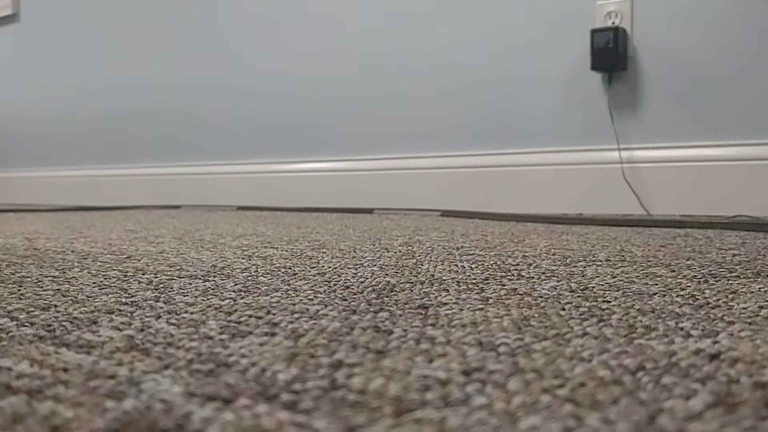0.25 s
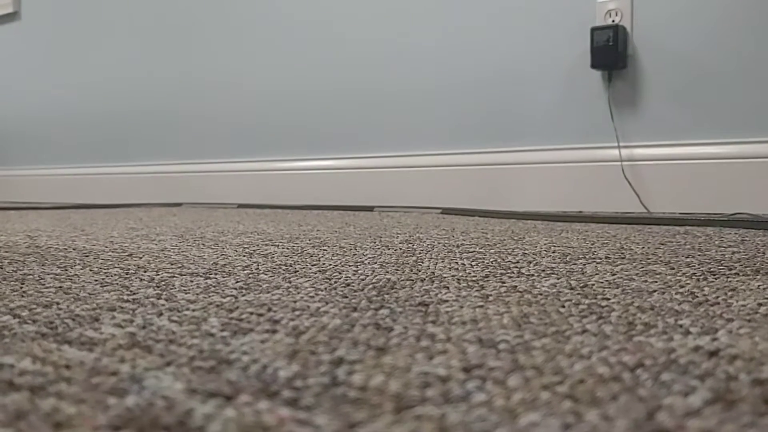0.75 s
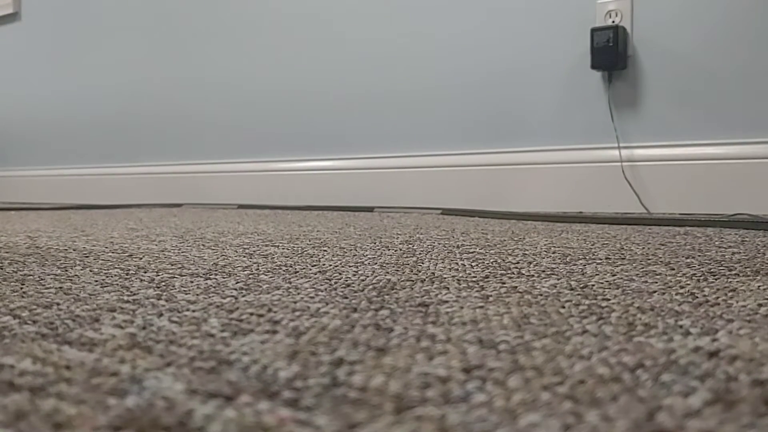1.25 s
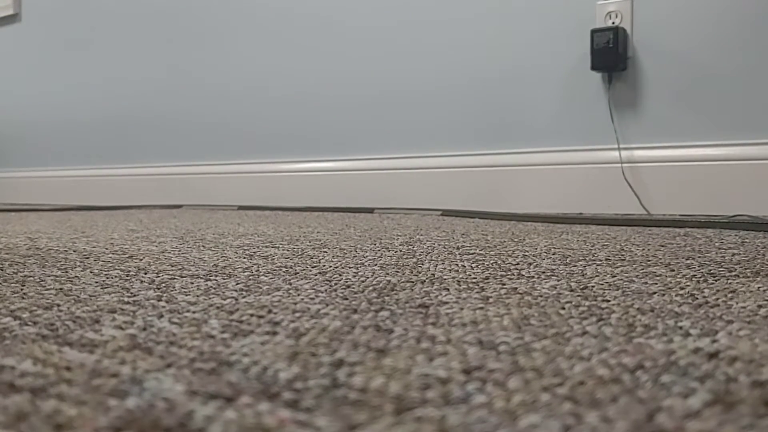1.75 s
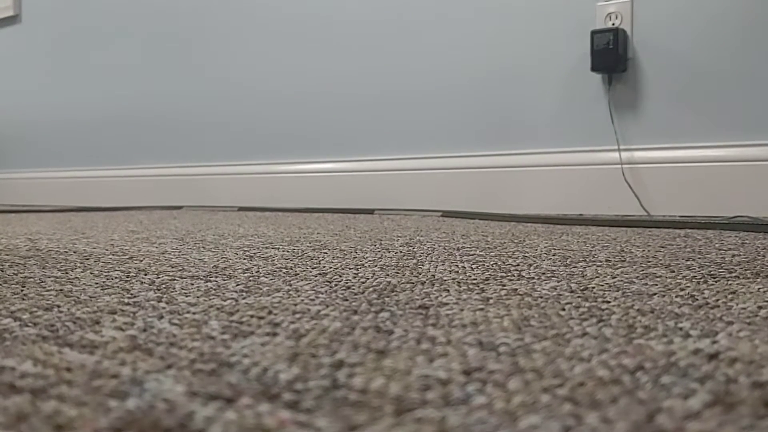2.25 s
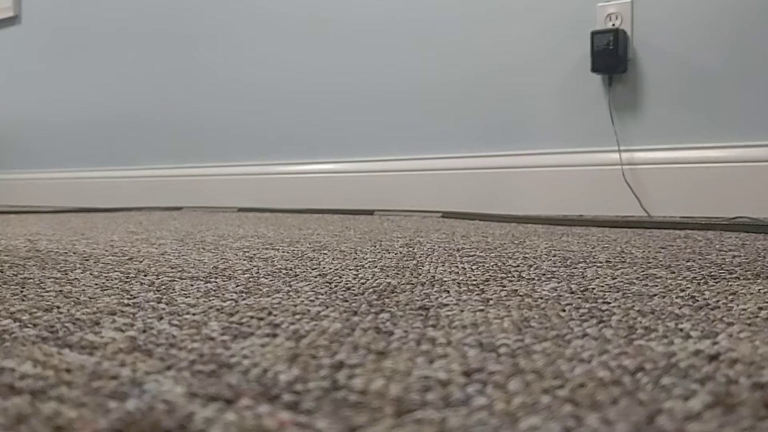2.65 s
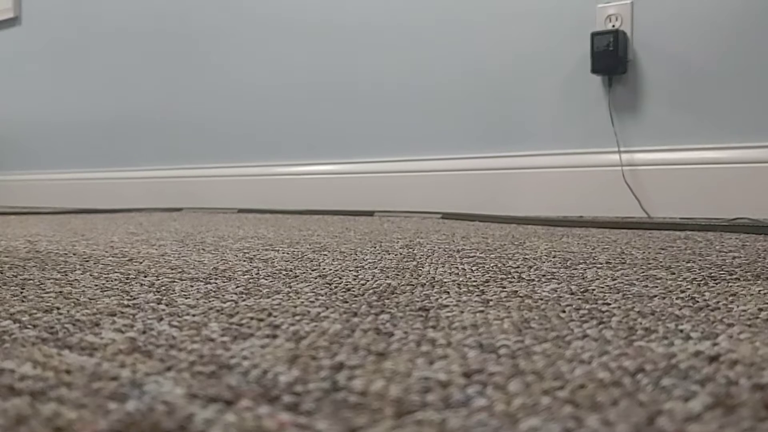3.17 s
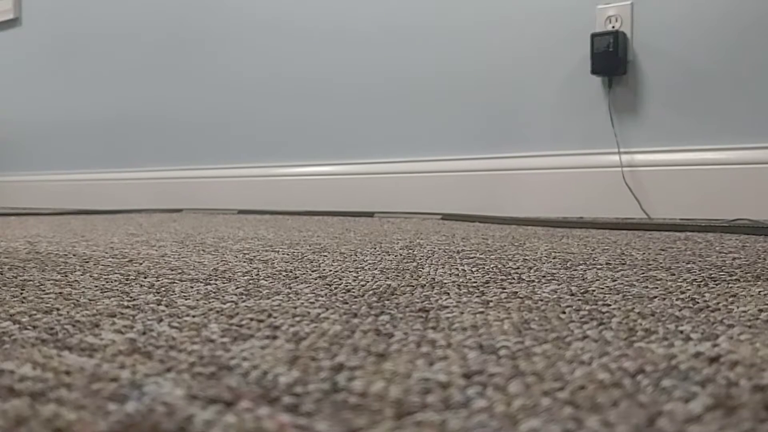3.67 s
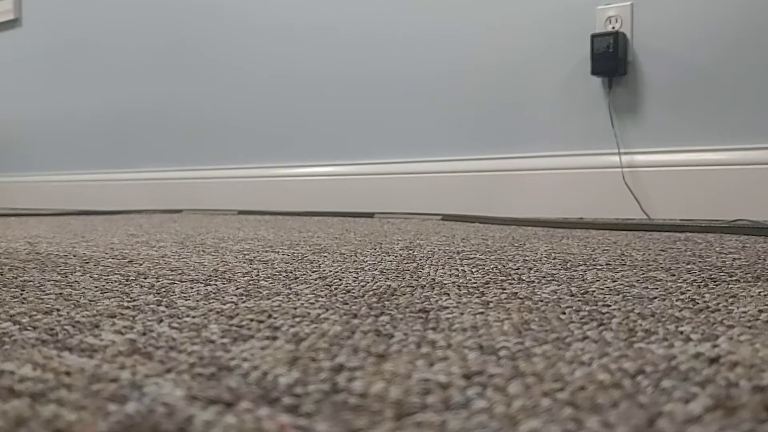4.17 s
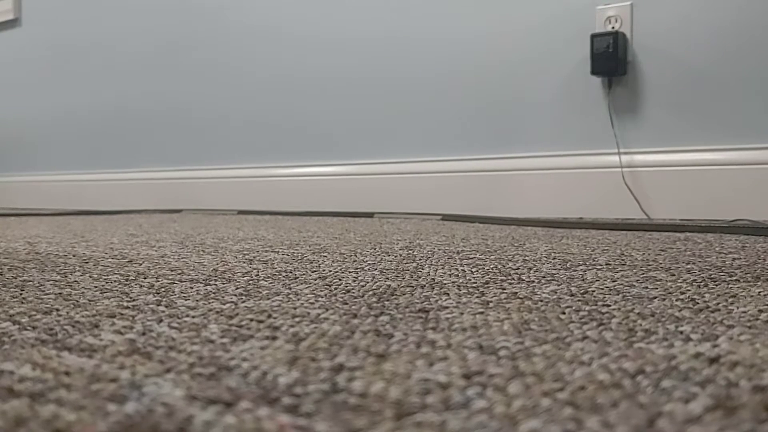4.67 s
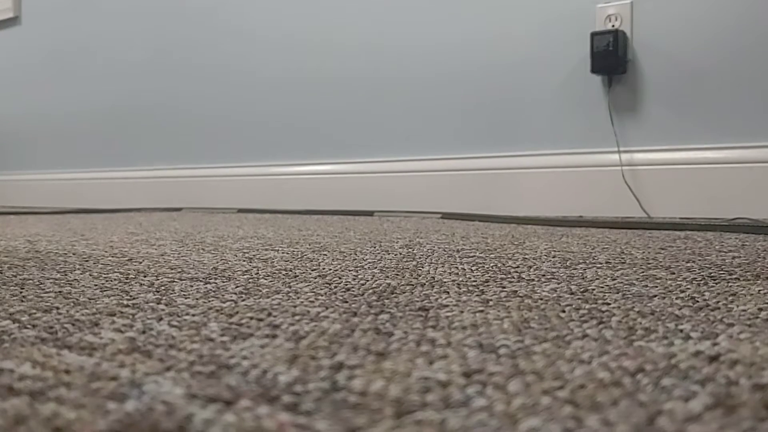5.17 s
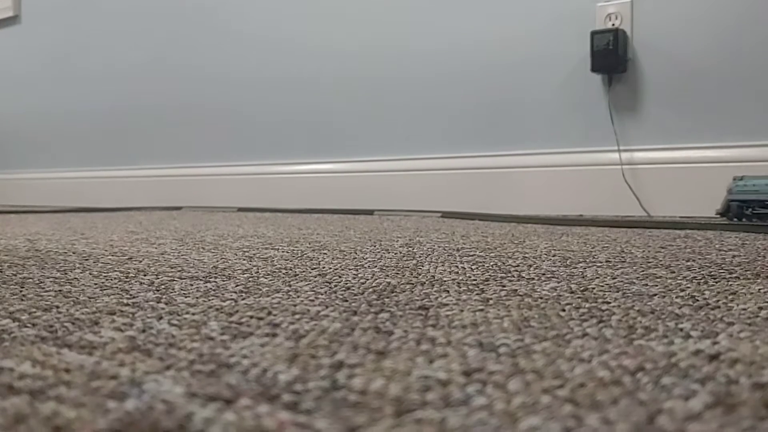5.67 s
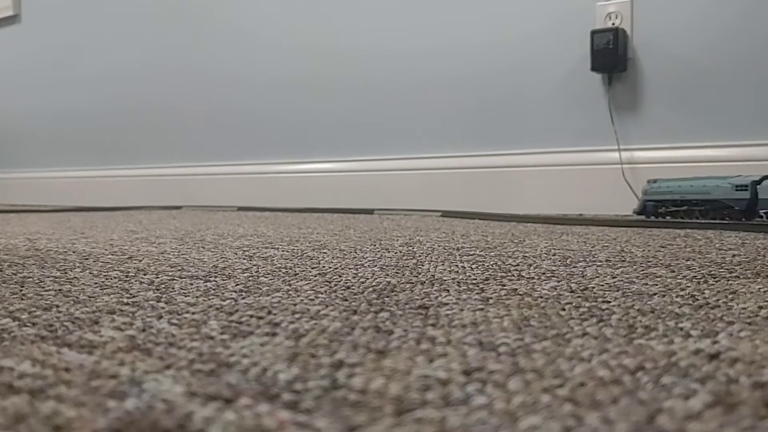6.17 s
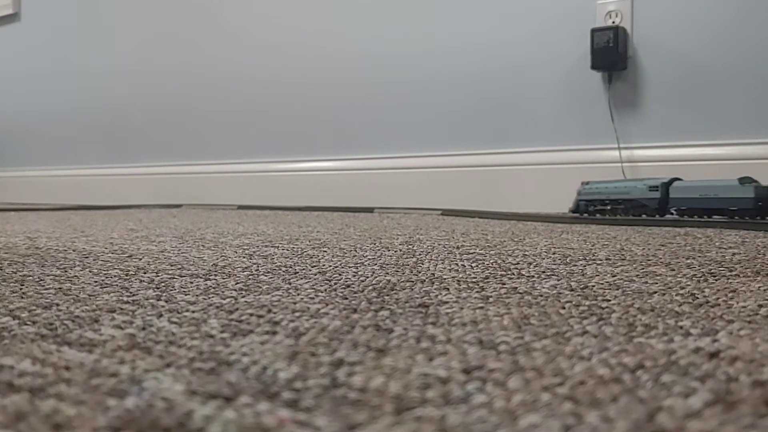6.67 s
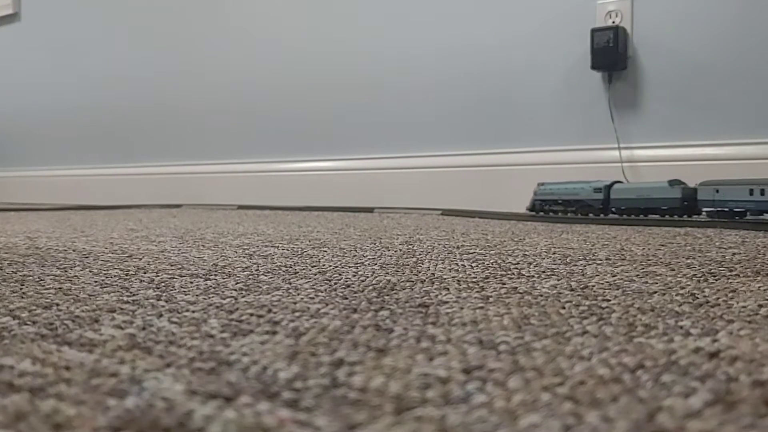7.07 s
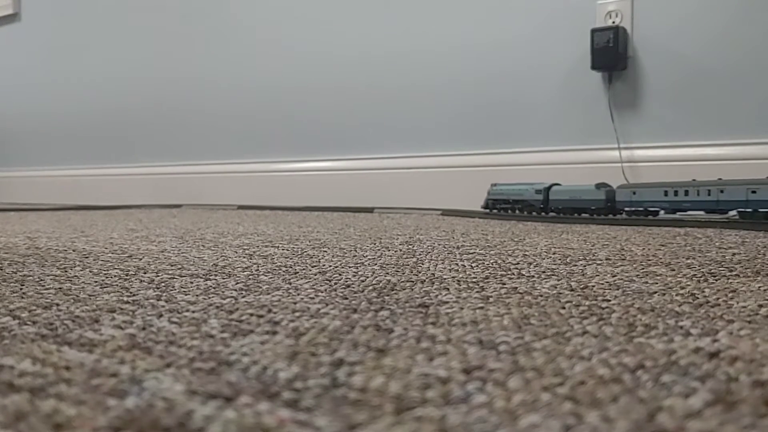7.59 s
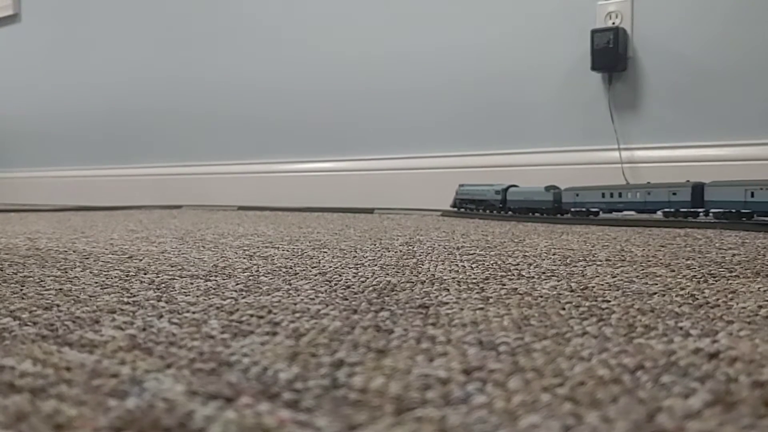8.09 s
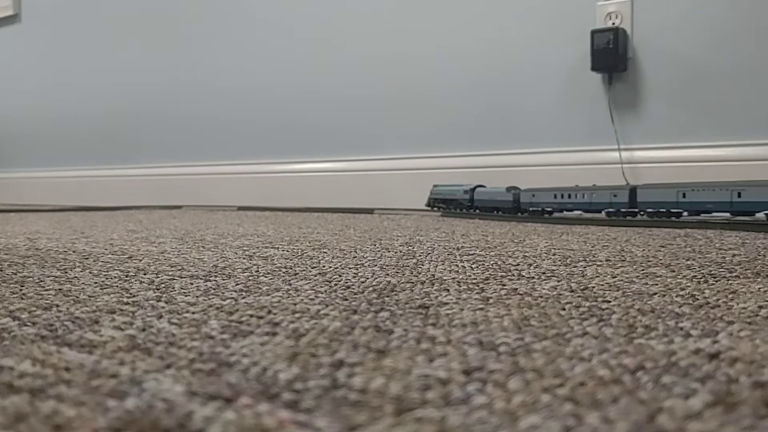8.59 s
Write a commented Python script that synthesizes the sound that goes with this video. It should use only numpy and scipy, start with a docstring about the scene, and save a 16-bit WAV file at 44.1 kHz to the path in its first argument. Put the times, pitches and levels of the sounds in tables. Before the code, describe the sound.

A model train rolls past on plastic track with a metallic sizzle, then moves off, clicking over rail joints and squeaking faintly.

```python
"""Faint rolling and gear whine over a low room rumble: a model train comes up from behind, on track
laid on a carpet, heard at floor level. It sweeps by on the right with a sizzle of metal wheels, then
rolls off along the wall, clicking over rail joints while a flange sticks and slips in the curve.
Wheel contact rattles the plastic track bed, rings the rails and shakes the floor. Gear teeth rattle
the locomotive's shell, a rocking coach buzzes, slack couplers clack."""
import sys
import numpy as np
from scipy import signal
from scipy.fft import rfft, irfft, next_fast_len
from scipy.io import wavfile
from scipy.ndimage import uniform_filter1d, map_coordinates

SR = 44100
rng = np.random.default_rng(int(sys.argv[2]) if len(sys.argv) > 2 else 0)


def unload_audio(sound):
    """Save the sound as a 16-bit wav file, at the path given as the first command line argument."""
    columns = np.transpose(np.atleast_2d(sound))
    # keep every value between -1 and 1, then stretch to whole-number steps
    steps = np.round(np.clip(columns, -1, 1) * 32767)
    wavfile.write(sys.argv[1], SR, steps.astype(np.int16))


N = 389844
TIME_S = np.arange(N) / SR
PASS_S, COME_S, GO_S = 2.772, 1.097, 1.27  # nearest moment; 10 dB rise and fall times

# Levels are relative; each source adds its own gain.
# place on the loop: t/s, place (0 far, 1 coming up, 2 alongside, 3 just past, 4 far again)
LOOP_PLACE = [(.9, 0), (1.65, 0.57), (2.5, 2), (3.2, 3), (3.95, 3), (5.2, 4)]
# train direction: t/s, L-R/dB
TRAIN_PAN = [(0, 2), (1.45, 5.5), (2.2, 4), (2.75, -1.5), (5.4, -2), (8.84, -1.5)]
# left-channel delay: t/s, lag/ms
LEFT_LAG = [(0, -.15), (1.2, -.05), (1.7, .2), (2.2, .47), (8.84, .48)]
# wheel hiss spectra (distant, close broadband, close rail modes): f/Hz, level/dB
HISS_FAR = [(4500, -22), (6500, 1), (7500, 0), (9000, -2.5), (10500, -4.5), (12000, -3), (13300, -2.6),
            (14500, -7), (15600, -11)]
HISS_BROAD = [(60, -48), (500, -22), (5000, -17.5), (7200, -11.5), (8200, -12.5), (8750, -9.5),
              (9300, -9.5), (10000, -16), (10700, -17), (15600, -20)]
HISS_MODES = [(10800, -25), (11300, -1.5), (11800, -3), (12200, -.5), (12450, -1.5), (12800, 1.5),
              (13400, 0), (13950, -2), (14400, -1), (14900, -2.5), (15500, -1.5)]
# bright band of the close hiss: t/s, lower f/Hz, upper f/Hz
HISS_EDGES = [(1.4, 13400, 15800), (1.8, 13300, 15700), (2.15, 13000, 15500), (2.45, 12600, 15100),
              (2.75, 12100, 14900), (3.15, 11550, 14100), (3.75, 11200, 13600)]
# wheels binding in curves: start t/s, length/s, level/dB
SCRUBS = [(3.696, 0.66, -44), (4.36, 0.89, -53), (5.3, 0.56, -61.5), (5.887, 0.63, -54.5),
          (6.597, 0.38, -54), (7.051, 0.37, -53.5), (7.822, 0.24, -60.5), (8.27, 0.13, -57)]
# hard strikes on rail joints: t/s, level/dB
JOINT_STRIKES = [(1.122, -36), (1.4927, -35), (1.762, -35), (1.808, -24), (1.8913, -29), (2.1579, -26),
                 (2.271, -22), (2.4362, -25), (2.489, -23), (2.5759, -24), (2.6258, -19), (2.848, -21),
                 (2.876, -22), (2.9554, -23), (2.977, -22), (3.0402, -25), (3.1614, -20), (3.2118, -28),
                 (3.2846, -29), (3.353, -26), (3.37, -29), (3.502, -27), (3.606, -26), (3.638, -15),
                 (3.741, -23.5), (3.75, -27), (3.8783, -23.5), (4.2644, -26), (4.3707, -24.5),
                 (4.4081, -29), (4.5166, -30), (4.6615, -29.5), (4.7318, -34), (4.7867, -35.5),
                 (4.8452, -33.5), (4.9503, -38), (5.0381, -38), (5.1533, -40), (5.2481, -35),
                 (5.3674, -39.5), (5.5305, -39.5), (5.594, -33), (5.598, -30), (5.6482, -41), (5.712, -34),
                 (6.019, -50), (6.3276, -41), (6.393, -36), (6.5073, -37), (6.6928, -40), (6.7542, -38),
                 (6.805, -35), (6.865, -28), (7.0485, -34), (7.1598, -38), (7.3269, -38), (7.4596, -45),
                 (7.5354, -41), (7.6582, -36), (7.934, -39), (7.985, -42), (8.0655, -33), (8.277, -40),
                 (8.3311, -40), (8.347, -37), (8.4214, -44)]
# strike spectra (metal, plastic bed): f/Hz, level/dB
TICK_SPECTRUM = [(500, -37), (1800, -21), (3500, -16), (5000, -9), (9000, -8), (10600, -8.5),
                 (11500, 0), (13300, 4.5), (15800, -3)]
CLATTER_SPECTRUM = [(150, -27), (450, -7), (800, 2), (1200, -21), (2000, 4.5), (3500, -4), (6000, -6)]
# rail resonances by train position: f/Hz, width/Hz, level/dB
RAIL_FAR = [(5350, 1400, 2.5), (6030, 240, 0), (6960, 720, -9)]
RAIL_AHEAD = [(4990, 220, 1), (5570, 420, -3.5), (6110, 250, 2), (6700, 300, -10), (5500, 3000, -14)]
RAIL_BESIDE = [(5020, 280, -3.5), (5550, 400, -3), (5870, 350, 0), (6130, 250, -4.5), (7300, 200, -12),
               (5400, 3000, -12)]
RAIL_BEHIND = [(2780, 300, -6), (4950, 280, -1.5), (5680, 480, -2), (6100, 300, -3.5), (7300, 170, -1),
               (8680, 220, -6), (5000, 3200, -5)]
# rolling envelope: t/s, level/dB
ROLL_LEVEL = [(0.0, -63), (1.03, -61.5), (1.7, -54.5), (2.7, -46.5), (3.1, -45.5), (3.45, -47.5),
              (3.65, -47), (4.28, -48), (4.42, -50.5), (4.54, -50), (5.25, -51.5), (5.42, -54), (5.7, -52),
              (6.5, -53.5), (6.85, -53), (7.05, -50.5), (7.3, -52.5), (7.78, -54), (8.1, -53), (8.7, -58.5),
              (8.84, -57)]
# track bed spectrum: f/Hz, level/dB
BED_SPECTRUM = [(130, -31), (340, -14.5), (550, -11), (700, -8.5), (900, -5.5), (1050, -6.5), (1400, -2.5),
                (1850, 0.2), (2450, 1), (3000, 1.5), (3700, -0.5), (4400, -3), (6500, -14), (10000, -47)]
# sidebands (gliding band, short rings): offset f/Hz, level/dB
GLIDE_SIDEBANDS = [(90, 0), (220, -7), (600, -15), (1500, -70)]
RING_SIDEBANDS = [(50, 0), (110, -9), (350, -40), (900, -90)]
# flange squeaks: start t/s, length/s, level/dB, f/Hz
SQUEAKS = [(5.476, .05, -63, 7800), (5.707, .06, -60, 8030), (5.827, 0.084, -52.5, 8030),
           (5.94, 0.055, -50.5, 8030), (6.03, 0.091, -51, 8029), (6.178, 0.24, -48.5, 8050),
           (6.48, 0.059, -47, 8050), (6.604, 0.22, -48.5, 7950), (7.139, 0.03, -54, 7990),
           (7.185, 0.19, -50.5, 7970), (7.8, 0.035, -50, 8000), (7.874, 0.091, -51, 7971),
           (8.047, 0.052, -47.5, 8050), (8.156, 0.06, -50.5, 8050), (8.26, 0.082, -47, 7950)]
# coach rocking: t/s, level/dB, half length/s
COACH_ROCKS = [(2.5, -49, .25), (2.86, -44.5, .14), (3.14, -45, 0.2), (3.5, -48, .14), (3.75, -41.5, 0.09),
               (4.0, -41.5, 0.13), (4.24, -43, 0.12), (4.42, -46.5, 0.18), (4.65, -44, 0.07),
               (4.82, -47, 0.13), (5.03, -49, 0.15), (5.24, -51.5, 0.09), (5.98, -56, 0.14),
               (7.16, -55, .16), (8.17, -55, .08), (8.402, -57.5, 0.05)]
# rubbed wheel and track modes: t/s, level/dB, half length/s, f/Hz
RUBBED_RINGS = [(1.45, -54, .35, 6120), (1.95, -60, .5, 800), (3.1, -56, 0.28, 820),
                (3.587, -44.5, .04, 2620), (7.275, -49.5, .025, 2460), (8.075, -53, .04, 2520),
                (8.41, -56, .04, 2550)]
# resonances (coach body, locomotive shell, coupler and car): f/Hz, width/Hz, level/dB
COACH_MODES = [(3555, 260, 0), (3600, 900, -14)]
LOCO_MODES = [(560, 100, -3), (732, 140, 1), (950, 210, 0), (1420, 230, 0.5), (1782, 220, 7.5),
              (2010, 120, 3)]
COUPLER_MODES = [(930, 260, 5), (2100, 1500, -4), (3500, 700, -5), (5050, 900, 0)]
# coupler snatches: t/s, level/dB
SNATCHES = [(6.985, -50), (7.098, -53), (7.344, -46), (7.461, -44.5), (8.35, -50)]
# gear whine envelope: t/s, level/dB
WHINE_LEVEL = [(0, -85), (1.0, -75), (1.7, -68), (2.4, -78), (3.2, -100)]
# gear tones: f/Hz, level/dB
GEAR_TONES = [(608, -20), (820, -5.5), (975, 0), (1244, -7.5), (1384, 3.5)]
# rumble spectra (floor, ventilation): f/Hz, level/dB
FLOOR_SPECTRUM = [(30, -52), (43, -24), (56, 0), (80, -5), (110, 6.5), (150, -1), (225, 3.5), (270, 1),
                  (320, -7.5), (600, -2), (900, -26), (1500, -46)]
VENT_SPECTRUM = [(28, -52), (40, -34), (53, -6), (65, -6), (80, -6), (95, -2), (112, 3), (140, -6.5),
                 (230, 0), (330, -9), (600, -7), (1500, -40), (5000, -25.5)]
# likeness of the channels: f/Hz, correlation
COHERENCE = [(60, .97), (250, .88), (500, .66), (1000, .38), (1800, .1), (2600, .16), (3200, .36),
             (4100, .1), (5300, .1), (6300, .88), (7400, .88), (8500, .5), (14000, .25)]
# channel balance: f/Hz, L-R/dB
BALANCE = [(100, 1), (400, -1), (1200, 2), (2400, 1), (7000, 4.5), (8000, -4), (9000, -7), (10500, -13),
           (12000, -17), (13000, -16), (15500, -10)]


def sizzle(jostle_db):
    """Fine wheel contact hiss; its colour glides down during the pass and flattens with distance."""
    side_db, = curves(TRAIN_PAN)
    place, = curves(LOOP_PLACE)
    grit = contact(rate_hz=930, spread_db=4.5, life_s=0.0018, share=0.35)
    close = np.clip(2 - np.abs(place - 2), 0, 1)
    hiss = close * reshaped(grit, hiss_band) + (1 - close) * coloured(grit, HISS_FAR)
    shade_db = -5 * swell(PASS_S, COME_S, GO_S)  # left side shadowed during the pass
    gain = metal_gain(near_db=-31.4, far_db=-57.5, scrub_db=2.5, lead_s=0.078, recede_db_per_s=0.33)
    return gain * amp(jostle_db) * pan(0.74 * side_db + shade_db) * hiss


def hiss_band(hz, t, below_db_per_hz=.011, above_db_per_hz=.006):
    """Close hiss colour: a bright band slides down the rails' highest modes, over duller noise."""
    at_s, low_hz, high_hz = np.transpose(HISS_EDGES)
    below_hz = np.maximum(np.interp(t, at_s, low_hz) - hz, 0)
    above_hz = np.maximum(hz - np.interp(t, at_s, high_hz), 0)
    band = amp(along(HISS_MODES, hz) - below_db_per_hz * below_hz - above_db_per_hz * above_hz)
    gain = np.hypot(band, amp(along(HISS_BROAD, hz)))
    return gain / np.linalg.norm(gain, axis=0)


def metal_gain(near_db, far_db, scrub_db, lead_s, recede_db_per_s=0):
    """Metal on metal: close pass, distant running and scrubbing add in power."""
    near = amp(near_db) * swell(PASS_S - lead_s, COME_S, GO_S)
    far = amp(far_db - recede_db_per_s * TIME_S)
    return np.sqrt(near ** 2 + far ** 2 + (amp(scrub_db) * scrubbing()) ** 2)


def scrubbing():
    """Gain of wheels binding in curves: grip builds, holds, lets go."""
    return sum(amp(db) * held(at_s, length_s, edge_s=0.18) for at_s, length_s, db in SCRUBS)


def rail_joints():
    """A wheel meets a rail end in a 1-2 ms burst; the track bed answers with a short low clatter."""
    t = np.arange(SR // 10) / SR
    blows = strikes()
    climb = t / 0.00057  # wheel rides up the rail end and drops off
    burst = climb ** 2 * np.exp(-climb) + amp(-24) * np.exp(-t / .012)
    knock = (1 - np.exp(-t / 0.00063)) * np.exp(-t / 0.013)
    tick = signal.fftconvolve(blows, burst)[:N] * coloured(noise_pair(), TICK_SPECTRUM)
    clatter = signal.fftconvolve(blows, knock)[:N] * coloured(noise_pair(), CLATTER_SPECTRUM)
    return amp(-2) * tick * pan([-5]) + amp(-22) * clatter


def strikes(rate_hz=38, from_s=3.3, to_s=8.5, near_db=-35, far_db=-51, scrub_db=4, scatter_db=2.5):
    """Joint impulses: listed hard ones, random light ones that grow with nearness and scrubbing."""
    light = (rng.random(N) < rate_hz / SR) * (TIME_S > from_s) * (TIME_S < to_s)
    near = amp(near_db) * swell(PASS_S, COME_S, GO_S)
    size = np.maximum(np.maximum(near, amp(scrub_db) * scrubbing()), amp(far_db))
    blows = light * size * amp(scatter_db * rng.standard_normal(N))
    for at_s, db in JOINT_STRIKES:
        blows[round(at_s * SR)] = amp(db)
    return blows


def rails(jostle_db):
    """Rolling keeps the rails ringing; different modes lead ahead of, beside and behind the train."""
    side_db, = curves(TRAIN_PAN)
    place, = curves(LOOP_PLACE)
    grit = contact(rate_hz=360, spread_db=5.5, life_s=0.0035, share=0.26)
    ring = sum(np.clip(1 - np.abs(place - k), 0, 1) * ringing(grit, modes)
               for k, modes in enumerate((RAIL_FAR, RAIL_AHEAD, RAIL_BESIDE, RAIL_BEHIND, RAIL_FAR)))
    flare_db = 1.5 * swell(2.57, 0.18, 0.18)  # wheels going by
    gain = metal_gain(near_db=-36, far_db=-62.5, scrub_db=-2, lead_s=0.017)
    return gain * amp(flare_db + 0.6 * jostle_db) * pan(1.5 * side_db) * ring


def track_bed(jostle_db):
    """Wheels rattle the plastic bed, whose colour shifts from spot to spot."""
    roll_db, = curves(ROLL_LEVEL)
    side_db, = curves(TRAIN_PAN)
    grit = contact(rate_hz=310, spread_db=2, life_s=0.004, share=0.29)
    rattle = reshaped(coloured(grit, BED_SPECTRUM), bed_patches)
    return amp(roll_db + 7 + 0.91 * jostle_db) * pan(side_db) * rattle


def bed_patches(hz, t, depth_db=1.3):
    """Random gains in patches about 350 Hz wide and 70 ms long."""
    field = uniform_filter1d(rng.standard_normal((len(hz), len(t))), size=4, axis=0)
    return amp(depth_db * unit(uniform_filter1d(field, size=12, axis=1)))


def rolling_glide(from_hz=3150, to_hz=2780, mid_s=2.56, glide_s=.14, peak_s=2.62, fade_db_per_s=12):
    """A rough narrow band of noise slides down in pitch around the pass, then fades."""
    hz = to_hz + (from_hz - to_hz) / (1 + np.exp((TIME_S - mid_s) / glide_s))
    fade_db = fade_db_per_s * np.maximum(TIME_S - peak_s, 0)
    gain = swell(peak_s, 0.36, np.inf) * amp(-40.5 - fade_db)
    grit = contact(rate_hz=200, spread_db=2, life_s=0.003, share=0.4)
    return gain * unit(coloured(grit, GLIDE_SIDEBANDS) * sine(hz)) * pan([-1.5])


def flange(slip_rate_hz=70, slip_db=4.5, linger_s=.04):
    """A flange sticks and slips in the curve: short unsteady squeaks of one wheel mode."""
    starts_s, _, _, mode_hz = np.transpose(SQUEAKS)
    grip = sum(amp(db) * held(at_s, length_s, edge_s=0.015) for at_s, length_s, db, _ in SQUEAKS)
    envelope = grip * amp(slip_db * wobble(slip_rate_hz))
    pitch_hz = np.interp(TIME_S, starts_s, mode_hz) + 50 * wobble(260)
    tone = unit(sine(pitch_hz, phase_rad=.5 * np.array([wobble(43), wobble(37)])))
    # wheel and room keep sounding between slips
    tail_power = signal.lfilter([1], [SR * linger_s, 1 - SR * linger_s], envelope ** 2)
    tail = np.sqrt(tail_power) * ringing(noise_pair(), [(8000, 220, 0)])
    return amp(-2.5) * envelope * tone + amp(-10.5) * tail


def coach():
    """A coach body buzzes at its resonance each time it rocks."""
    rock_power = sum((amp(db) * swell(at_s, half_s, half_s)) ** 2 for at_s, db, half_s in COACH_ROCKS)
    buzz = ringing(contact(rate_hz=180, spread_db=5.5, life_s=0.0016, share=0.31), COACH_MODES)
    return np.sqrt(rock_power) * amp(1.2 + 0.56 * wobble(22)) * pan([3.5]) * buzz


def locomotive(hidden_db=-13, in_view_db=-1.5, passing_db=7, bend_mid_s=4.7, bend_length_s=1.2):
    """Gear teeth rattle the shell, harder on each rod stroke; clearest going by and past the bend."""
    roll_db, = curves(ROLL_LEVEL)
    in_view = np.clip((TIME_S - bend_mid_s) / bend_length_s + .5, 0, 1)
    view_db = hidden_db + (in_view_db - hidden_db) * in_view
    pass_db = passing_db * swell(1.75, 0.62, 0.62)  # ahead of its coaches
    stroke_db = 2.1 * sine(9.3 + 0.884 * wobble(2.64))
    teeth = contact(rate_hz=120, spread_db=-1, life_s=0.0086, share=0.91)
    return amp(roll_db + view_db + pass_db + stroke_db) * ringing(teeth, LOCO_MODES)


def rubbed_rings():
    """Single wheel or track modes are rubbed into short narrow rings."""
    flutter = coloured(noise_pair(), RING_SIDEBANDS)
    return flutter * sum(amp(db) * swell(at_s, half_s, half_s) * unit(np.sin(2 * np.pi * hz * TIME_S))
                         for at_s, db, half_s, hz in RUBBED_RINGS)


def couplers(attack_s=0.001, decay_s=0.005):
    """Slack couplers snatch with a dull clack and a knock of the car body."""
    t = np.arange(SR // 5) / SR
    blows = np.zeros(N)
    for at_s, db in SNATCHES:
        blows[round(at_s * SR)] = amp(db)
    knock = (1 - np.exp(-t / attack_s)) * np.exp(-t / decay_s)
    return amp(9) * signal.fftconvolve(blows, knock)[:N] * ringing(noise_pair(), COUPLER_MODES)


def gear_whine():
    """The locomotive's gears whine faintly as it comes up; the tones waver together in pitch."""
    level_db, = curves(WHINE_LEVEL)
    speed = 1 + 0.00604 * wobble(15) + 0.0121 * wobble(90)
    run_s = np.cumsum(speed) / SR
    return amp(level_db) * sum(amp(db + 2.5 * wobble(7.5)) * unit(np.sin(2 * np.pi * hz * run_s))
                               for hz, db in GEAR_TONES)


def floor_rumble(full_db=-63, knee_db=-53, db_per_db=1.5):
    """The floor under the carpet shakes more as the rolling grows, up to a limit."""
    roll_db, = curves(ROLL_LEVEL)
    level_db = full_db + db_per_db * np.minimum(roll_db - knee_db, 0)
    shake = contact(rate_hz=59, spread_db=0.5, life_s=0.012, share=0.37)
    return amp(level_db) * coloured(shake, FLOOR_SPECTRUM)


def room():
    """Low ventilation rumble and weak mains hum."""
    hum = unit(sine(119.5 + 0.91 * wobble(5.5)))
    return amp(-64.5) * coloured(noise_pair(), VENT_SPECTRUM) + amp(-76) * hum


def contact(rate_hz, spread_db, life_s, share):
    """Smooth friction plus tiny random impacts, which carry the given share of the power."""
    hits = (rng.random(N) < rate_hz / SR) * amp(spread_db * np.minimum(rng.standard_exponential(N), 4))
    power = signal.lfilter([1], [1, -np.exp(-1 / (life_s * SR))], hits ** 2)
    return noise_pair() * np.sqrt(1 - share + share * power / power.mean())


def noise_pair():
    """Stereo white noise, alike in the bass, partly scattered by the room above it."""
    def mid_side_gains(hz):
        angle_rad = np.arccos(along(COHERENCE, hz)) / 2
        return np.array([np.cos(angle_rad), np.sin(angle_rad)])
    mid, side = filtered(rng.standard_normal((2, N)), mid_side_gains)
    return np.array([mid + side, mid - side])


def amp(db):
    """Decibels to gain."""
    return 10 ** (np.asarray(db) / 20)


def unit(x):
    """Scale to rms 1."""
    return x / np.sqrt(np.mean(x ** 2) + 1e-20)


def sine(hz, phase_rad=0):
    """Sine following a per-sample frequency."""
    return np.sin(2 * np.pi * np.cumsum(hz) / SR + phase_rad)


def along(points, hz):
    """(f/Hz, value) points read on a log axis."""
    knots_hz, values = np.transpose(points)
    return np.interp(np.log(hz + 1), np.log(knots_hz + 1), values)


def curves(rows):
    """Per-sample values of each column after t/s."""
    at_s, *columns = np.transpose(rows)
    return [np.interp(TIME_S, at_s, column) for column in columns]


def wobble(rate_hz):
    """Smooth random curve, rate_hz knots a second."""
    knots = rng.standard_normal(int(N * rate_hz / SR) + 4)
    return map_coordinates(knots, [TIME_S * rate_hz], order=2)


def swell(at_s, rise_s, fall_s):
    """Bell peaking at 1; 10 dB down rise_s before and fall_s after."""
    t = TIME_S - at_s
    return amp(-10 * np.minimum((t / np.where(t < 0, rise_s, fall_s)) ** 2, 20))


def held(start_s, length_s, edge_s):
    """Gate with linear ramps of edge_s."""
    t = TIME_S - start_s
    return np.clip(np.minimum(t, length_s - t) / edge_s + .5, 0, 1)


def filtered(x, response):
    """x through a gain of frequency."""
    size = next_fast_len(N + SR // 4)
    return irfft(rfft(x, size) * response(np.fft.rfftfreq(size, 1 / SR)), size)[..., :N]


def coloured(x, spectrum):
    """x through a (f/Hz, level/dB) spectrum, at rms 1."""
    return unit(filtered(x, lambda hz: amp(along(spectrum, hz))))


def ringing(x, modes):
    """x through steep-skirted resonances (f/Hz, width/Hz, level/dB), at rms 1."""
    def peak(hz, mode_hz, width_hz):
        return np.abs(hz * width_hz / (mode_hz ** 2 - hz ** 2 + 1j * hz * width_hz)) ** 2
    return unit(filtered(x, lambda hz: sum(amp(db) * peak(hz, f, width) for f, width, db in modes)))


def reshaped(x, gain):
    """x through a gain of frequency and time, at rms 1."""
    hz, t, spectra = signal.stft(x, SR, nperseg=512)
    _, shaped = signal.istft(spectra * gain(hz[:, None], t), SR, nperseg=512)
    return unit(shaped[..., :N])


def pan(side_db):
    """Constant-power left and right gains for an L-R difference."""
    gains = amp(np.outer([.5, -.5], side_db))
    return gains / np.sqrt(np.mean(gains ** 2, axis=0))


def scene():
    """Train, floor and room; once the train has come round, its rolling reaches the right first."""
    jostle_db = 0.45 * wobble(9) + 0.77 * wobble(30)  # cars rocking on uneven track
    left, right = (track_bed(jostle_db) + coach() + gear_whine() + locomotive() + couplers()
                   + rubbed_rings())
    lag_ms, = curves(LEFT_LAG)
    left = map_coordinates(left, [np.arange(N) - lag_ms * SR / 1000], order=5)
    metal = rails(jostle_db) + sizzle(jostle_db) + rolling_glide() + rail_joints() + flange()
    return np.array([left, right]) + metal + floor_rumble() + room()


def record(dry):
    """Left channel shaded in the high treble; nothing passes above the band limit."""
    top_hz = 15850
    return filtered(dry, lambda hz: pan(along(BALANCE, hz)) * (hz < top_hz))


dry = scene()
out = record(dry)
unload_audio(out)
```